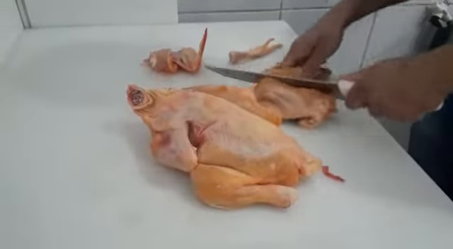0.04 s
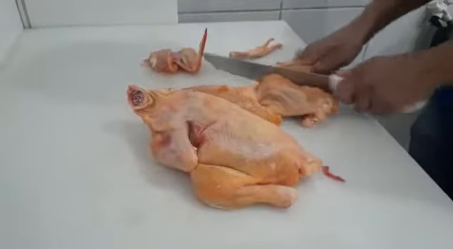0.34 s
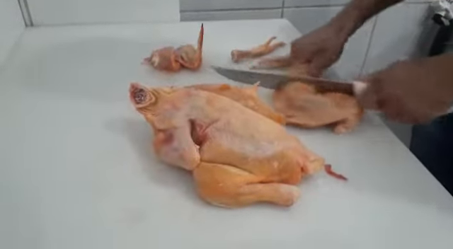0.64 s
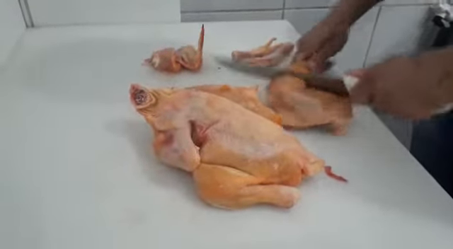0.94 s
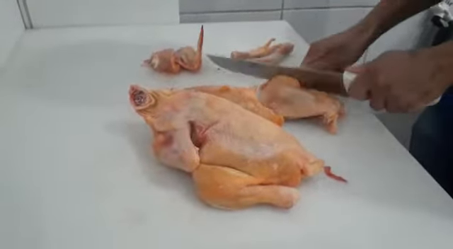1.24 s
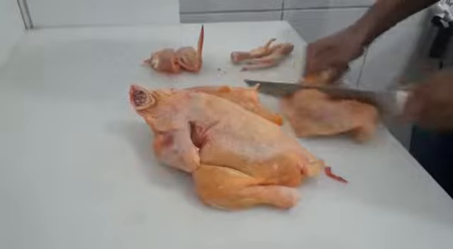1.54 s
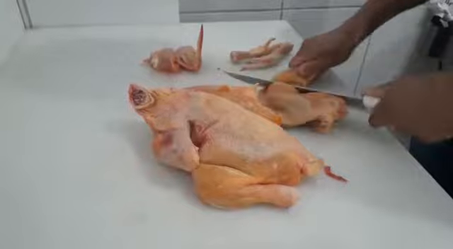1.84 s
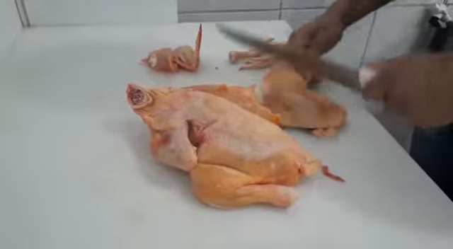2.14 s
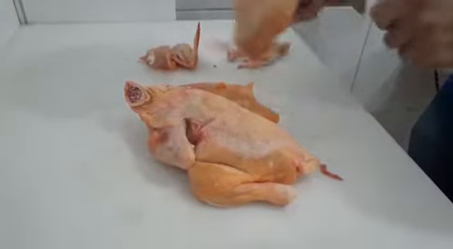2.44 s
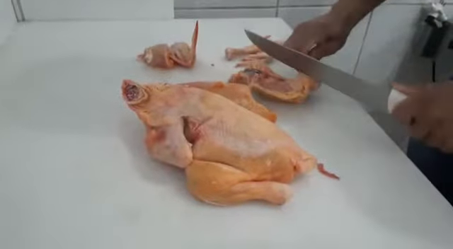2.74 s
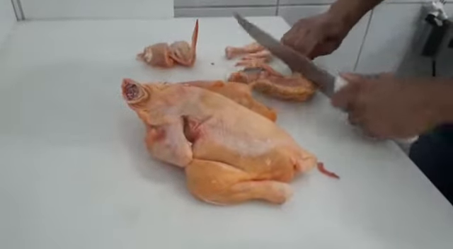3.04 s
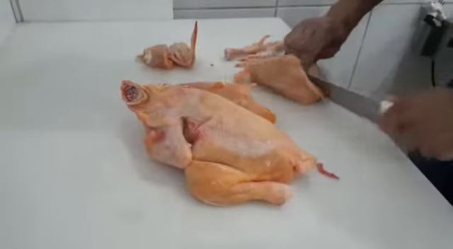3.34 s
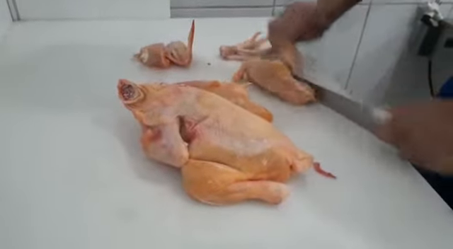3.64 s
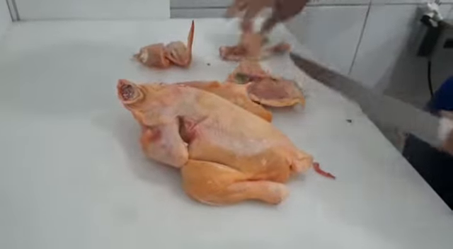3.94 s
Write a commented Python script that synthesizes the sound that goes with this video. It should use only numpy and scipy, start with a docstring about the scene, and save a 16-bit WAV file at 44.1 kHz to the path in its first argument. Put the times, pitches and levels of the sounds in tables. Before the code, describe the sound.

Close and slightly to the right, a knife saws through raw chicken with wet hisses, snaps and dull thuds. A sharp chop follows, then a joint crunches and the blade hits the board, over a steady low kitchen hum.

```python
"""A wet hiss of a knife through chicken skin opens over the beating hum of two cooling motors.
We are in a tiled kitchen, a cook jointing the raw bird on a plastic board right of the microphone.
Fibres tear, gristle snaps and the blade pings once on a bone. The knife knocks on the board,
crunches through a joint and lands hard, so that the table booms."""
import sys
import numpy as np
from scipy import signal
from scipy.fft import rfft, irfft
from scipy.io import wavfile
from scipy.ndimage import uniform_filter1d

SR = 44100
rng = np.random.default_rng(int(sys.argv[2]) if len(sys.argv) > 2 else 0)


def inscribe(sig):
    """Save sig as 16-bit PCM at rate SR to the path in sys.argv[1].

    A 1-D sig is mono; a 2-D sig holds one channel per row.
    Samples are clipped to [-1, 1] before scaling.
    """
    pcm = np.round(np.clip(np.atleast_2d(sig).T, -1, 1) * 32767)
    wavfile.write(sys.argv[1], SR, pcm.astype(np.int16))


N = 176400
TIME = np.arange(N) / SR
FREQS = np.fft.rfftfreq(N, 1 / SR)
# Lean at the microphone; negative is to the right.
KNIFE_LEFT_DB, BOARD_LEFT_DB, LOW_LEFT_DB = -2.5, -1.5, -0.5
# Share of the direct power common to both microphone channels.
KNIFE_SHARED, BOARD_SHARED = 0.079, 0.31


def amp(db):
    """Decibels to gain."""
    return 10 ** (np.asarray(db) / 20)


def unit(x):
    """Scales to rms 1."""
    return x / np.sqrt(np.mean(x ** 2) + 1e-20)


def read(points, hz):
    """Reads a curve on a log-frequency axis."""
    f, value = np.transpose(points)
    return np.interp(np.log(hz + 1), np.log(f + 1), value)


def sides(left_db):
    """Raises the left channel by left_db and lowers the right as much."""
    return amp([[left_db], [-left_db]])


def colour(x, points):
    """Causal filter of the given spectrum that keeps the power of white noise."""
    hz = abs(np.fft.fftfreq(8192, 1 / SR))
    log_gain = np.log(unit(amp(read(points, hz))))
    minimum_phase = np.exp(np.conj(signal.hilbert(log_gain)))
    taps = np.fft.ifft(minimum_phase).real
    return signal.fftconvolve(np.atleast_2d(x), taps[None, :len(taps) // 2], axes=1)[:, :N]


def narrow(hz, width_hz):
    """Noise in one narrow resonance; at 0 Hz, a random waver."""
    resonance = 1 + ((FREQS - hz) / width_hz * 2) ** 2
    return unit(irfft(rfft(rng.standard_normal(N)) / resonance, N))


def grains(spread_db, per_s=7000):
    """Dense tiny ruptures of uneven size."""
    size = amp(spread_db * np.minimum(rng.exponential(1, N), 4))
    return unit(size * rng.choice([-1, 1], N) * (rng.random(N) < per_s / SR))


def burst(start_s, rise_s, hold_s, decay_s):
    """Attack, hold and exponential release."""
    t = TIME - start_s
    return np.clip(t / rise_s, 0, 1) * np.exp(-np.clip((t - rise_s - hold_s) / decay_s, 0, 20))


def ring(modes, start_s, rise_s):
    """Dying sines of a struck object."""
    t = np.arange(SR // 2) / SR
    tone = sum(amp(db - 60 * t / t60) * np.sin(2 * np.pi * hz * t) for hz, db, t60 in modes)
    attack = np.clip((TIME - start_s) / rise_s, 0, 1)
    return np.pad(tone, (round(start_s * SR), N))[:N] * attack


# Reverberation of the kitchen: frequency_hz, t60_s
KITCHEN_DECAY = [(100, 0.21), (500, 0.3), (1500, 0.47), (4000, 0.46), (9000, 0.43), (15000, 0.41)]


def room(x, gap_s=0.0034):
    """The tiles return a diffuse tail that dies at each frequency's own speed."""
    hz, t, spectrum = signal.stft(x, SR, nperseg=256)
    decay = amp(-60 * t / read(KITCHEN_DECAY, hz)[:, None]) ** 2 * np.clip(t / gap_s - 1, 0, 1)
    blurred = uniform_filter1d(abs(spectrum) ** 2, 65, axis=0)
    power = signal.fftconvolve(blurred, decay / decay.sum(1, keepdims=True), axes=1)[:, :len(t)]
    noise = signal.stft(rng.standard_normal((2, N)), SR, nperseg=256)[2]
    return signal.istft(noise / noise.std() * np.sqrt(abs(power)), SR, nperseg=256)[1][:, :N]


def crackle(force, spectrum, left_db, shared, spread_db, wet_db):
    """Tiny ruptures under a force reach the microphone directly and off the tiles."""
    common, left, right = (grains(spread_db) * force for _ in range(3))
    direct = np.sqrt(shared) * common + np.sqrt(1 - shared) * np.array([left, right])
    return colour(direct + amp(wet_db) * room(common), spectrum) * sides(left_db)


# Fan air in the room, before its bass roll-off: frequency_hz, relative_db
AIR_COLOUR = [(18, -48), (30, -38), (55, -32), (86, -36), (106, -3.5), (127, 2), (153, -13), (239, -10.5),
              (273, -26.5), (336, -23), (512, -20), (801, -27), (2680, -36.5), (3980, -47), (16000, -56)]
# Likeness of that air left and right of the microphone: frequency_hz, correlation
AIR_LIKENESS = [(60, .98), (150, 1), (300, 0.82), (600, 0.83), (1200, 0), (3000, 0), (15000, 0)]


def fan_air(level_db=-38, low_cut_hz=230):
    """Steady fan air, nearly mono in the bass and diffuse above."""
    left, other = rfft(rng.standard_normal((2, N)))
    same = read(AIR_LIKENESS, FREQS)
    right = same * left + np.sqrt(1 - same ** 2) * other
    gain = amp(read(AIR_COLOUR, FREQS)) * FREQS / np.hypot(FREQS, low_cut_hz)
    return amp(level_db) * unit(irfft(np.array([left, right]) * gain, N)) * sides(-2.0)


# Tones of the cooling motors, almost centre: pitch_hz, relative_db
MOTOR_TONES = [(119.9, -37.2), (126.63, -35.1), (239.8, -44.5)]
# Room resonances stirred by the motors: pitch_hz, width_hz, level_db
ROOM_DRONE = [(45.9, 2, -47.5), (75, 3, -53.5), (108, 22, -45), (182, 27, -46.5), (328.9, 7, -60.5),
              (502, 30, -56.5), (622, 15, -55)]


def motor_hum(gain_db=-0.5, waver=0.067, in_phase_s=.073):
    """Two motors a few hertz apart beat over the low drone of the room."""
    t = TIME - in_phase_s
    tones = sum(amp(db) * np.sqrt(2) * np.cos(2 * np.pi * hz * t) * (1 + waver * narrow(0, 4.4))
                for hz, db in MOTOR_TONES)
    drone = sum(amp(db) * narrow(hz, width) for hz, width, db in ROOM_DRONE)
    return (amp(gain_db) * tones + drone) * sides(LOW_LEFT_DB)


# The table shaking and the meat dragging: time_s, level_db
SHAKE_LEVEL = [(0, -69), (.5, -40), (.8, -36.5), (1.1, -38.5), (1.45, -37.5), (1.7, -42.5), (2.2, -45.5),
               (2.5, -71), (4, -61)]
DRAG_LEVEL = [(0, -47), (.25, -46.5), (.4, -42.5), (.6, -42), (.85, -46.5), (1.1, -47), (1.55, -47.5),
              (2.1, -49.5), (2.5, -49.5), (4, -52)]
# Their rumble and rub: frequency_hz, relative_db
SHAKE_SPECTRUM = [(20, -12), (42, 4), (70, 3), (105, -9), (150, -2.5), (300, -16), (700, -55.5)]
DRAG_SPECTRUM = [(100, -19), (300, -1), (600, -3.5), (850, 2), (1100, -3), (1400, -2.5), (1900, -7),
                 (2800, -11), (3600, -15.5), (6000, -18.5), (15000, -36.5)]


def sawing():
    """Sawing shakes the table and drags the meat over the board."""
    shake_force = amp(np.interp(TIME, *np.transpose(SHAKE_LEVEL)))
    drag_force = amp(np.interp(TIME, *np.transpose(DRAG_LEVEL)))
    shake = colour(rng.standard_normal(N), SHAKE_SPECTRUM) * shake_force * sides(LOW_LEFT_DB)
    drag = crackle(drag_force, DRAG_SPECTRUM, BOARD_LEFT_DB, BOARD_SHARED, spread_db=3.5, wet_db=-1)
    return shake + drag


# Knife through skin and flesh, right of the microphone: peak_s, rise_s, fall_s, level_db
STROKES = [(0, .02, 0.029, -38.5), (.39, 0.077, 0.026, -43.5), (.55, 0.044, 0.047, -42.5),
           (.77, .03, 0.026, -46), (.99, 0.1, 0.061, -50), (1.429, 0.0049, 0.039, -36.5),
           (1.459, 0.031, 0.056, -39), (1.58, 0.036, 0.11, -47.5), (1.80, .04, 0.04, -48),
           (1.887, 0.046, 0.038, -44.5), (2.11, 0.057, 0.026, -50), (2.3, 0.2, .2, -59),
           (3.11, .02, .12, -56.5), (3.25, 0.058, .05, -53), (3.31, 0.035, 0.023, -36.5),
           (3.432, 0.0093, .015, -36), (3.45, .007, 0.013, -26), (3.495, .03, 0.039, -38.5),
           (3.66, .06, 0.034, -40.5)]
# Its wet hiss: frequency_hz, relative_db
HISS_SPECTRUM = [(200, -2), (1000, 4), (2500, -1), (4200, 4.5), (7000, -3.5), (9200, 2.5), (12000, 0.5),
                 (15500, -2.5)]


def slices(clump_db=2.76):
    """Each stroke tears fine fibres in an uneven hiss that swells and fades."""
    power = np.zeros(N)
    for at, rise, fall, db in STROKES:
        from_peak = (TIME - at) / np.where(TIME < at, rise, fall)
        power += amp(db) ** 2 * np.exp(-2 * np.minimum(from_peak ** 2, 20))
    force = np.sqrt(power) * amp(clump_db * narrow(0, width_hz=120))
    return crackle(force, HISS_SPECTRUM, KNIFE_LEFT_DB, KNIFE_SHARED, spread_db=3, wet_db=-3.5)


# Gristle and small bones snapping at the knife: start_s, level_db, decay_s
GRISTLE_SNAPS = [(.327, -49, 0.0026), (0.503, -45, .003), (0.568, -33, 0.0037), (.7118, -39, .002),
                 (0.7252, -28.5, 0.0064), (0.7664, -35, .003), (1.0208, -34.5, 0.0068), (1.055, -49, .003),
                 (1.2853, -39, 0.0028), (1.5224, -24, 0.0032), (1.7689, -47, .002), (1.7863, -54, .002),
                 (1.8146, -29, 0.0034), (1.8447, -26, 0.0034), (2.1316, -53, .003), (2.6484, -41, 0.011),
                 (2.666, -26.5, 0.0086), (3.096, -51, 0.0045), (3.2753, -30.5, 0.0026), (3.3787, -45, .002),
                 (3.4452, -26, 0.0058)]
# Their bright crackle: frequency_hz, relative_db
SNAP_SPECTRUM = [(200, 0), (1300, 1.5), (2300, 0), (4200, 4), (7000, -1), (9200, 2), (12000, 2), (15500, 1)]


def snaps(rise_s=.001, hold_s=0.0037):
    """Gristle breaks in a few milliseconds of crackle."""
    force = sum(amp(db) * burst(at, rise_s, hold_s, decay) for at, db, decay in GRISTLE_SNAPS)
    return crackle(force, SNAP_SPECTRUM, KNIFE_LEFT_DB, KNIFE_SHARED, spread_db=5.5, wet_db=-3.5)


# Modes of the blade, heard in the centre: pitch_hz, relative_db, t60_s
BLADE_MODES = [(7600, -11, .03), (9000, 2, 0.035), (9440, -1, 0.037), (9911, -10, .02), (10900, -3, 0.025),
               (11900, 2, 0.019), (12400, 2, 0.013), (14120, -4, .018)]


def blade_ping(start_s=1.0222, gain_db=-24.5, wet_db=-9, tail_t60_s=0.45):
    """The blade ticks on a bone; the flesh damps it at once and the room holds a thin ring."""
    blade = amp(gain_db) * ring(BLADE_MODES, start_s, rise_s=.001)
    tail = rng.standard_normal((2, N)) * amp(-60 * TIME / tail_t60_s)
    wet = signal.fftconvolve(blade[None], tail / np.linalg.norm(tail[0]), axes=1)[:, :N]
    return blade + amp(wet_db) * wet


# The joint giving way on the board, a little to the right: start_s, level_db, decay_s
JOINT_BREAKS = [(3.444, -27, 0.012), (3.458, -17.5, 0.0044), (3.4637, -19.5, 0.0084), (3.473, -31, 0.0046),
                (3.481, -38, .004), (3.591, -35, 0.0079)]
# Its crunch against the board: frequency_hz, relative_db
JOINT_SPECTRUM = [(80, -7), (200, 3), (420, -2), (600, -1.5), (730, 3.5), (880, -1.5), (1110, 3),
                  (1400, -1), (1800, -6.5), (3000, -15), (5200, -19), (7000, -37), (15000, -32)]


def joint_crunch(rise_s=0.0013, hold_s=.002):
    """The joint breaks in quick steps that rattle the board."""
    force = sum(amp(db) * burst(at, rise_s, hold_s, decay) for at, db, decay in JOINT_BREAKS)
    return crackle(force, JOINT_SPECTRUM, BOARD_LEFT_DB, BOARD_SHARED, spread_db=0.5, wet_db=-3)


# Blows on the board, more direct sound than room: start_s, crack_db, clack_db, thud_db, boom_db
BLOWS = [(1.098, -63, -63, -31.5, -25.5), (1.527, -47, -49, -28.5, -23), (2.6663, -20, -27.5, -32, -13),
         (3.529, -24.5, -19.5, -24, -12)]
# Crack of the edge, clack of the board, soft weight of the meat: frequency_hz, relative_db
EDGE_SPECTRUM = [(200, -3), (700, -1), (1400, -1.5), (2500, -1.5), (4200, 0), (6200, -10), (8000, -17),
                 (15000, -26)]
BOARD_SPECTRUM = [(80, -37), (200, -5), (350, 2), (470, -3.5), (640, 6.5), (880, -2), (1120, 3.5),
                  (1400, -2), (1800, -9.5), (3000, -14.5), (5200, -40), (9000, -71)]
MEAT_SPECTRUM = [(80, -19.5), (170, -7), (300, 3), (400, -12.5), (600, -6.5), (1500, -50.5)]
# Modes of the table under the board: pitch_hz, relative_db, t60_s
TABLE_MODES = [(59.5, -23, 0.35), (85.6, -4.5, 0.053), (102.7, -2.5, 0.39), (163.5, -6, .14),
               (261, -23, 0.36), (330, -21, 0.035)]


def knocks(spread_db=0.5, boom_lag_s=0.00512):
    """The edge cracks on the board, the board clacks, the meat thuds and the table booms."""
    times, crack_db, clack_db, thud_db, boom_db = np.transpose(BLOWS)
    edge = np.array([burst(at, rise_s=.001, hold_s=0.0021, decay_s=.002) for at in times])
    push = np.array([burst(at, rise_s=0.0026, hold_s=0.011, decay_s=0.0095) for at in times])
    table = np.array([ring(TABLE_MODES, at + boom_lag_s, rise_s=.003) for at in times])
    crack = crackle(amp(crack_db) @ edge, EDGE_SPECTRUM, KNIFE_LEFT_DB, KNIFE_SHARED, spread_db,
                    wet_db=-8.5)
    clack = crackle(amp(clack_db) @ push, BOARD_SPECTRUM, BOARD_LEFT_DB, BOARD_SHARED, spread_db,
                    wet_db=-6)
    thud = crackle(amp(thud_db) @ push, MEAT_SPECTRUM, LOW_LEFT_DB, shared=0.98, spread_db=spread_db,
                   wet_db=-12.5)
    boom = amp(boom_db) @ table * sides(LOW_LEFT_DB)
    return crack + clack + thud - boom


def scene():
    """The kitchen from the microphone's place: room tone, then the work at the board."""
    room_tone = motor_hum() + fan_air()
    return room_tone + sawing() + slices() + snaps() + blade_ping() + knocks() + joint_crunch()


def record(dry, low_cut_hz=43, high_cut_hz=16250):
    """The recorder's bass cut and band limit."""
    bass_cut = 1 - np.exp(-(FREQS / low_cut_hz) ** 6)
    low_pass = signal.firwin(401, high_cut_hz, window=("kaiser", 9), fs=SR)
    return signal.oaconvolve(irfft(rfft(dry) * bass_cut, N), low_pass[None], "same")


dry = scene()
out = record(dry)
inscribe(out)
```